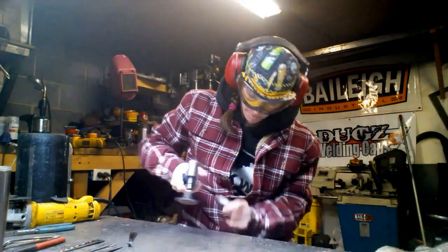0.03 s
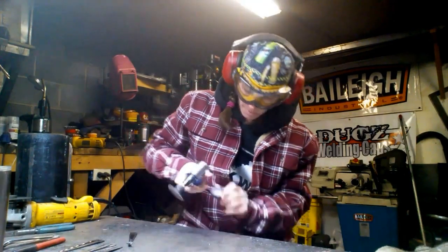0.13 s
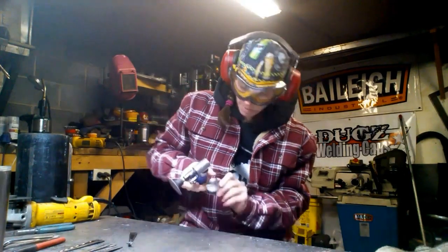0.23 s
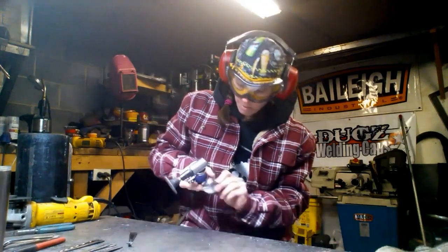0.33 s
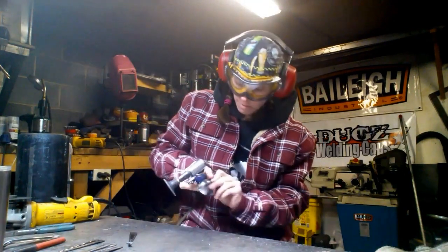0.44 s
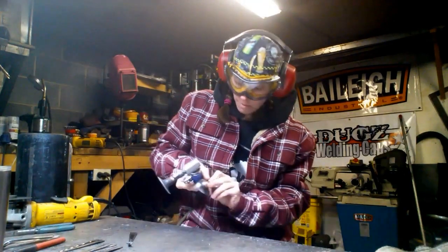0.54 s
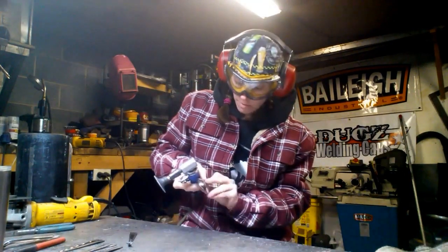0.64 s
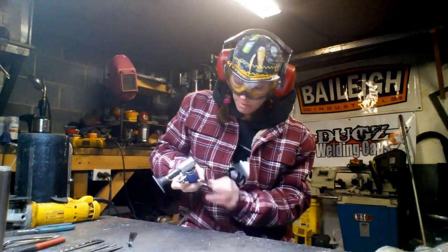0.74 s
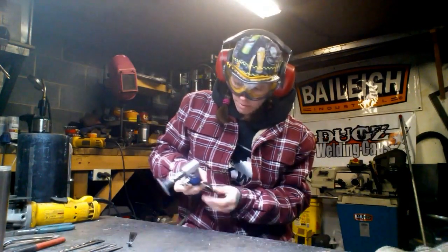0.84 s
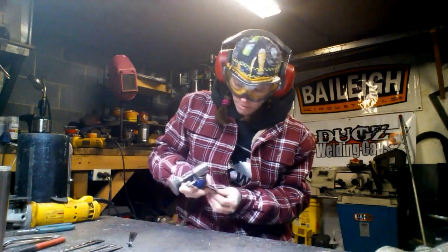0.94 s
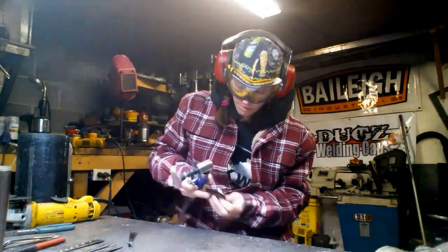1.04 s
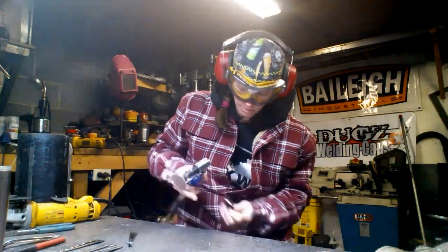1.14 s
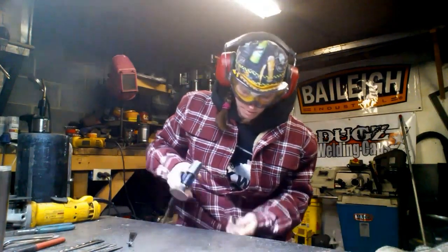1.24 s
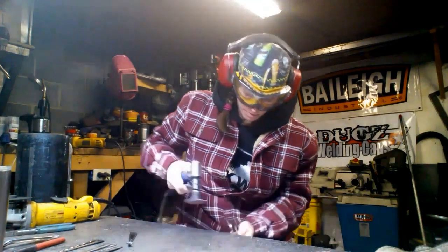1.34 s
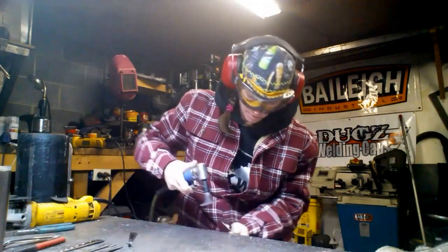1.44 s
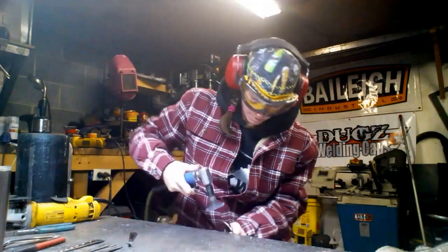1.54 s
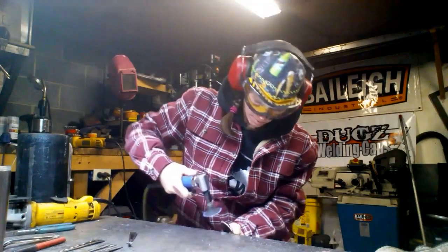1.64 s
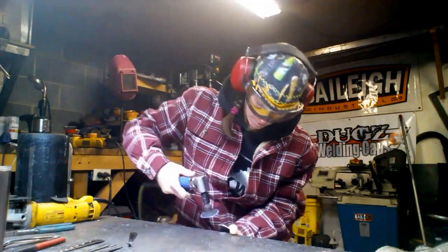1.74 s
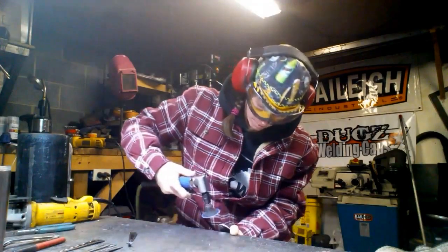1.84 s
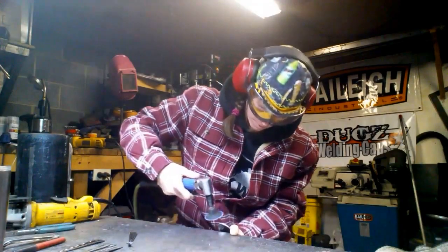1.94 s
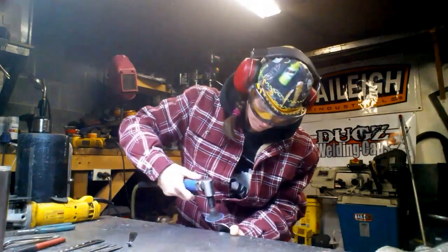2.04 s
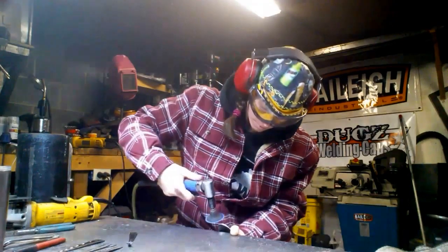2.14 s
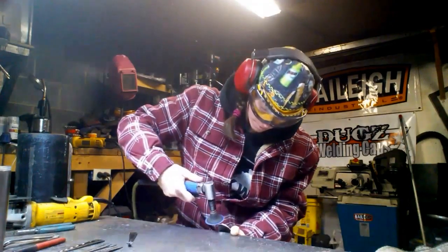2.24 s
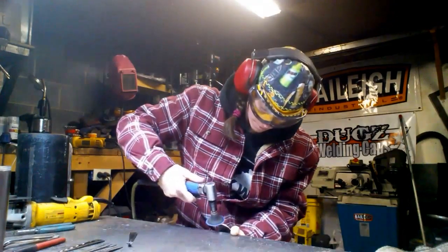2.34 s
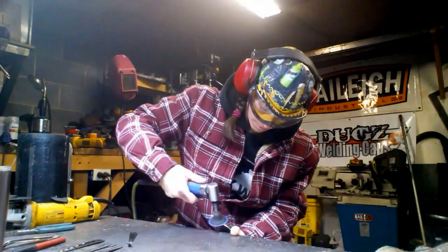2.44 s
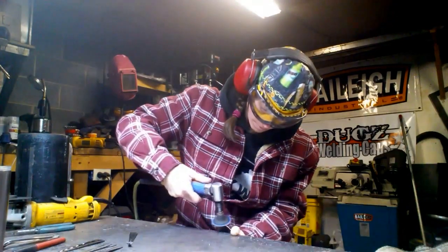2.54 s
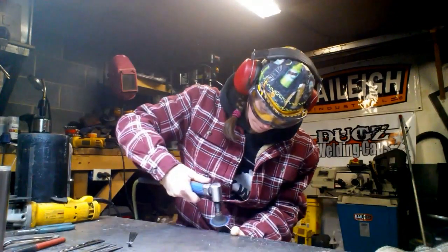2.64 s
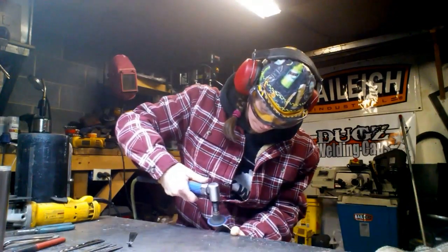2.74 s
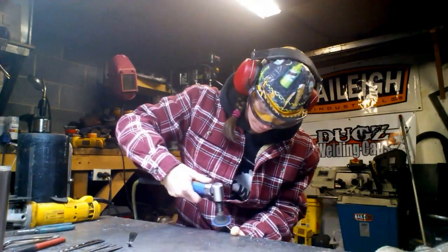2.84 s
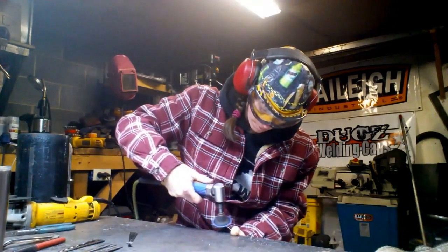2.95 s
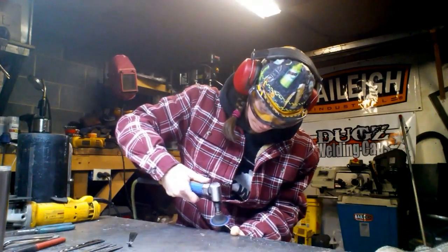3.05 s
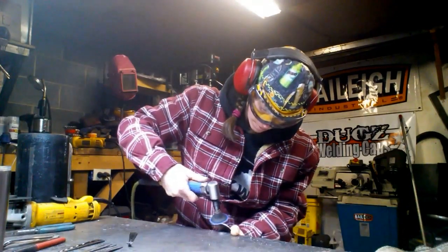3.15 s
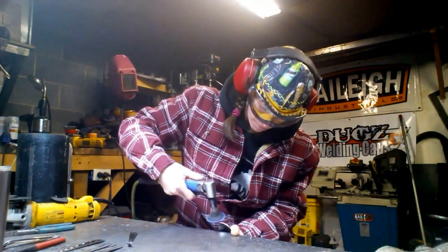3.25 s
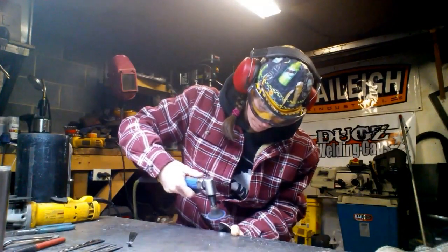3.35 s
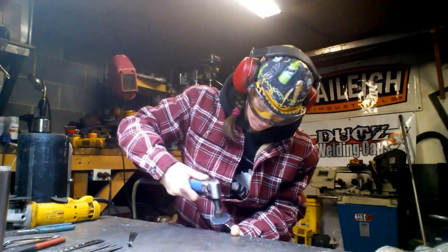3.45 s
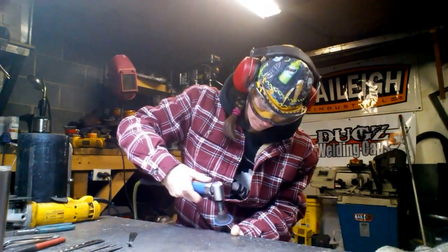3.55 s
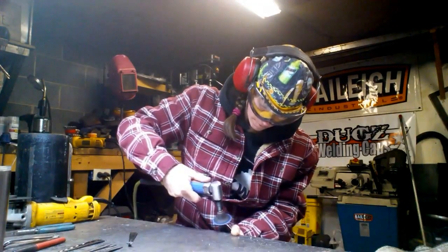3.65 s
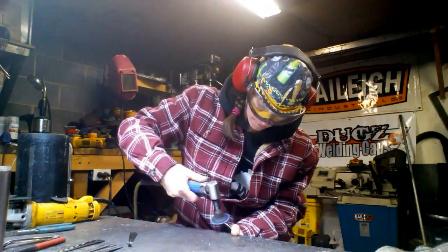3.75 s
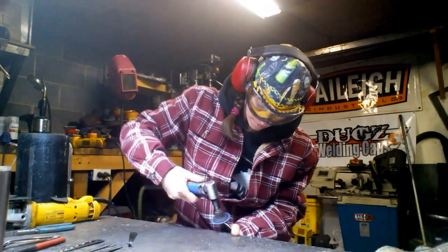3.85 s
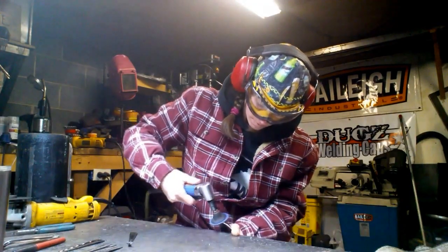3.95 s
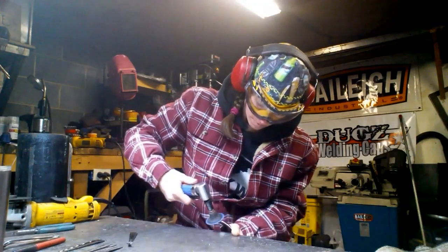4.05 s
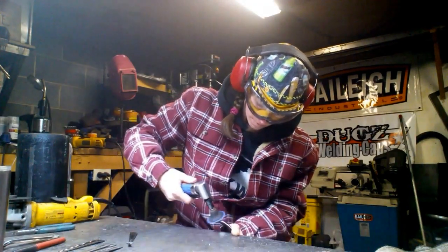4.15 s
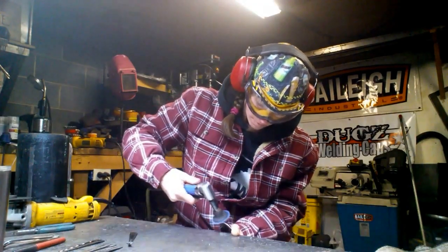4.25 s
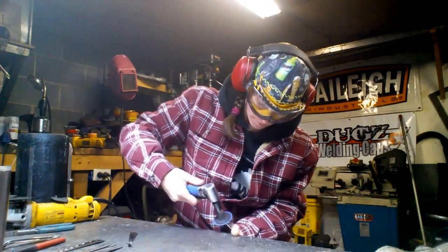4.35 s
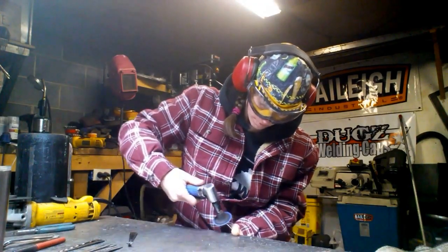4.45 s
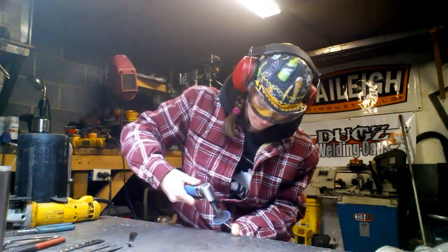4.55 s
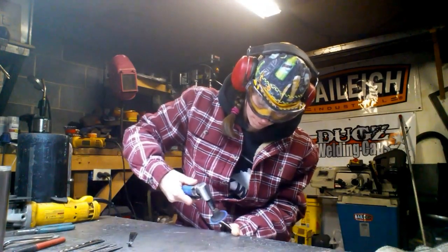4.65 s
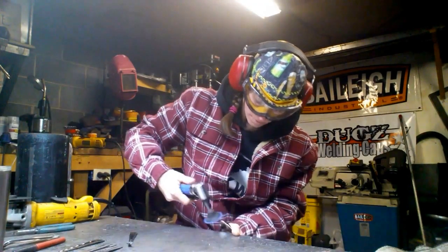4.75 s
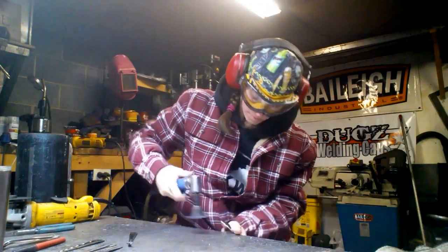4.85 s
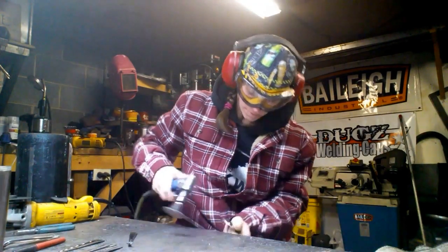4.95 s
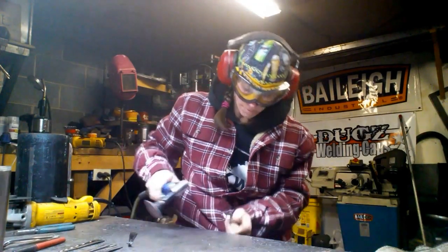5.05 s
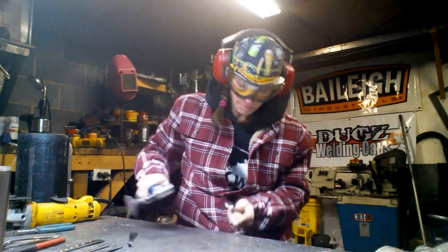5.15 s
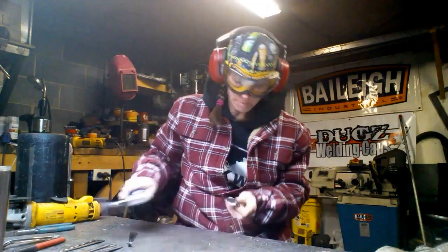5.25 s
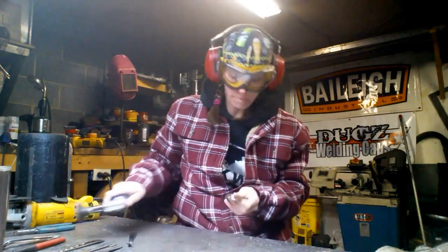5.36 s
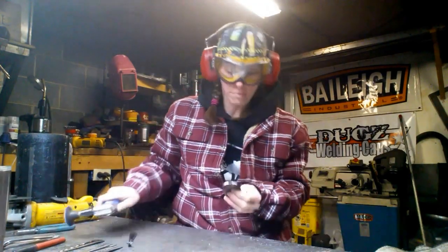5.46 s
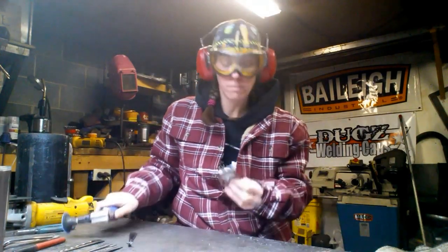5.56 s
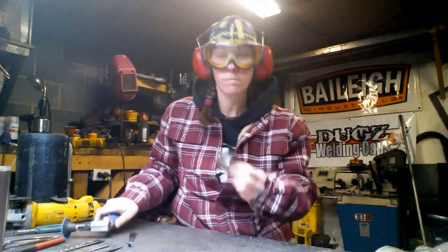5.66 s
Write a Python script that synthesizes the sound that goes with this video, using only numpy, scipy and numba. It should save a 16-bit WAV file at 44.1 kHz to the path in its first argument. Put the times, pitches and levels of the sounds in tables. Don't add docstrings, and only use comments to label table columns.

```python
import sys
import numpy as np
from scipy import signal
from scipy.fft import rfft, irfft
from scipy.io import wavfile
from scipy.ndimage import uniform_filter1d
from numba import njit

SR = 44100
rng = np.random.default_rng(int(sys.argv[2]) if len(sys.argv) > 2 else 0)


def voltage_ratio(decibels):
    exponent = np.asarray(decibels, float) / 20
    return 10 ** exponent


def persist_wave(psi):
    counts = np.round(np.clip(psi, -1, 1) * 32767).astype(np.int16)
    wavfile.write(sys.argv[1], SR, np.atleast_2d(counts).T)


N = 252252
t = np.arange(N) / SR
TOP_HZ = 14540
SQUEEZE_S, SPIN_S = 2.2, 2.243
VANES = 4


def shape(table, hz):
    f, db = np.transpose(table)
    return np.interp(np.log(hz), np.log(f), db, left=-120)


def walk(rate):
    k = int(SR / rate)
    held = np.repeat(rng.standard_normal(N // k + 1), k)
    return 1.305 * uniform_filter1d(uniform_filter1d(held, k), k)[:N]


def noise(table, flicker_db, rate, ridges=()):
    hz = np.arange(N // 2 + 1) * SR / N + 1e-3
    lift = 1 + sum(voltage_ratio(db) / (1 + (2 * (hz - f) / w) ** 2) for f, w, db in ridges)
    white = rfft(rng.standard_normal(N))
    colour = white * voltage_ratio(shape(table, hz)) * lift * (hz < TOP_HZ + 200)
    out = 0
    for k in np.arange(8, 29):
        band = np.cos(np.pi / 2 * np.clip(2 * np.log2(hz) - k, -1, 1)) ** 2
        if np.any(np.abs(colour * band) > 1e-2):
            out = out + irfft(colour * band, N) * voltage_ratio(flicker_db * walk(rate))
    return out / np.std(out)


def ramp(start, length):
    return np.clip((t - start) / length, 0, 1)


# (frequency [Hz], level [dB rms])
HUM = [(120.8, -53), (249, -54), (499, -56), (726.7, -66), (850.6, -69), (1394, -66.5), (1572, -74),
       (1744, -49), (2492, -71.5), (2993, -74), (3289, -70), (3741, -78.5)]
# (frequency [Hz], density [dB per Hz])
SHOP = [(15, -52), (25, -30), (63, -13.5), (120, -6.5), (260, -1.5), (430, -13.5), (600, -13),
        (1000, -17.5), (1600, -19.5), (2200, -21.5), (3300, -20.5), (5700, -27.5), (8800, -27),
        (14400, -25)]
# (frequency [Hz], width [Hz], lift [dB])
FANS = [(567, 65, 3), (654, 14, 3), (1260, 97, -1), (1430, 50, 0), (1965, 170, -0.5), (2580, 170, 2),
        (3110, 98, -2.5), (3310, 97, -3), (3760, 120, 3.5), (7860, 230, 3), (8800, 230, 3)]


def shop():
    hum = 0
    for f, db in HUM:
        level_db = db + 2.4 * walk(12) * min(400 / f, 1)
        drift = np.cumsum(2.5 * walk(8) * (f < 600)) / SR
        line = np.sin(2 * np.pi * (f * t + rng.random() + drift))
        hum = hum + voltage_ratio(level_db) * np.sqrt(2) * line
    return hum + voltage_ratio(-48.5) * noise(SHOP, flicker_db=2.5, rate=9, ridges=FANS)


# (easing starts [s], valve shut [s], loose vanes start to slap [s])
RELEASES = [
    (.062, .0775, .082),
    (4.922, 4.965, 4.973),
]


def trigger():
    first = t < SQUEEZE_S
    ease, shut, slap = (np.where(first, a, b) for a, b in np.transpose(RELEASES))
    slap_rise_s = 0.0084
    return ramp(ease, shut - ease), np.maximum(t - shut, 0), ramp(slap, slap_rise_s)


def gain_db():
    duck_db, lift_db, creep_db_s = -14.5, 13.5, 2.5
    wait_s, lift_s, grab_s = 1.197, 0.085, .03
    before_work = t < SQUEEZE_S + .1
    quiet = np.where(before_work, np.maximum(t - RELEASES[0][1], 0), trigger()[1])
    lift = lift_db / (1 + np.exp((wait_s - quiet) / lift_s)) + creep_db_s * quiet
    grab = np.where(before_work, 1 - ramp(SQUEEZE_S + 0.014, grab_s), 1)
    return duck_db + lift * grab


@njit
def walls(x, lags, gain, damp):
    line, soft, out = np.zeros((8, 4096)), np.zeros(8), np.zeros(len(x))
    for i in range(len(x)):
        total = 0.
        for k in range(8):
            soft[k] += (1 - damp) * (gain[k] * line[k, (i - lags[k]) & 4095] - soft[k])
            total += soft[k]
        out[i] = total
        for k in range(8):
            line[k, i & 4095] = x[i] + soft[k] - total / 4
    return out


# (frequency [Hz], density [dB per Hz])
CRACK = [(470, -28), (800, -9.5), (959, -8.5), (1560, -8.5), (1760, -2.5), (4560, -6), (4970, -4.5),
         (8160, -9.5), (12000, -19), (14400, -21)]


def steel_grain():
    return noise(CRACK, flicker_db=3, rate=170)


# (time [s], peak [dB], crack [dB])
CLINKS = [
    (1.8609, -26, 6),
    (1.896, -17.5, 5),
    (1.9488, -34.5, 6.5),
]
# (frequency [Hz], level [dB], t60 [s])
PIECE = [(955, 0, 0.16), (1238, -0.5, 1.2), (1750, -8.5, 0.27), (3130, -20, 0.061), (3820, 2, 5.0),
         (5260, -6.5, 0.23), (5720, -11.5, 0.19), (5500, -7, 0.086), (6030, -5, 0.036), (6260, -43, 0.77),
         (7260, -6, 0.16), (6700, -34, 5.0), (7500, -7, 0.71), (8134, -3.5, 0.39)]


def clinks(grain):
    out, u = np.zeros(N), t[:8000]
    for s, db, crack_db in CLINKS:
        start = int(s * SR)
        ring = 0
        for f, mode_db, t60 in PIECE:
            mode = np.sin(2 * np.pi * (f * u + rng.random()))
            ring = ring + voltage_ratio(mode_db) * mode * voltage_ratio(-60 * u / min(t60, .12))
        crack = grain[start:][:len(u)] * (voltage_ratio(-60 * u / 0.14) + 0.16 * voltage_ratio(-60 * u / 0.07))
        hit = 0.43 * ring / np.abs(ring).max() + voltage_ratio(crack_db - 13.0) * crack
        out[start:][:len(u)] += voltage_ratio(db - 1.5) * hit * (1 - np.exp(-u / 0.00055))
    return out


# (time [s], peak [dB])
CATCHES = [(0.039, -35), (2.568, -52), (2.778, -27), (2.836, -39.5), (2.865, -40), (2.899, -25),
           (3.002, -42), (3.05, -25.5), (3.074, -31.5), (3.11, -48), (3.393, -38), (3.419, -33),
           (3.484, -27.5), (3.535, -33.5), (3.663, -26)]


def catches(grain):
    out, u = np.zeros(N), t[:8000]
    push = (u / .0005) * (1 - u / 0.0024) * np.exp(1 - u / .0005)
    for s, db in CATCHES:
        start = int(s * SR)
        scrape = 0.33 * grain[start:][:len(u)] * voltage_ratio(-60 * u / 0.1)
        out[start:][:len(u)] += voltage_ratio(db + 5.0) * (push + scrape)
    return out


# (time [s], rate [Hz])
SPEED = [(0, 1380), (.06, 1455), (2.61, 1388), (2.69, 1312), (2.85, 1360), (2.96, 1294), (3.14, 1334),
         (3.4, 1208), (3.5, 1450), (3.7, 1468), (3.95, 1350), (4.17, 1358), (4.255, 1292), (4.32, 1432),
         (4.46, 1388), (4.66, 1422), (4.78, 1368), (4.88, 1250)]


def speed():
    runup_s, runup_shape, coast_s, crawl_hz = .057, 1.2, .088, 125
    inertia_s = .07
    first, idle = t < SQUEEZE_S, trigger()[1]
    free = np.interp(t, *np.transpose(SPEED))
    free = np.where(first, free, uniform_filter1d(free, size=int(inertia_s * SR)))
    free = np.interp(t - idle, t, free)
    run = 1 - np.exp(-(np.maximum(t - SPIN_S, 0) / runup_s) ** runup_shape)
    up = np.where(first, 1, run)
    hz = crawl_hz + (free * up - crawl_hz) * np.exp(-idle / coast_s)
    return uniform_filter1d(hz, size=400), (1380 - free) / 100


# (time after the squeeze [s], level below full flow [dB])
OPENING = [(0, -47), (.01, -12.5), (.024, -12.5), (.036, -0.5), (.052, -6.5), (.08, -2.5), (.13, -0.5)]


def opening_db():
    return np.where(t < SQUEEZE_S, 0, np.interp(t - SQUEEZE_S, *np.transpose(OPENING)))


def puffs(shaft):
    return (1 + .12 * np.sin(shaft)) * (1 + 0.24 * np.sin(VANES * shaft))


# (frequency [Hz], density [dB per Hz])
GRIT = [(880, -8.5), (1500, -17.5), (1700, -10), (2460, -5), (3230, -9), (5010, -7), (5550, -8.5),
        (6070, -14), (7000, -5), (9100, -23.5), (15400, -120)]


def grit(shaft):
    (closed, idle, _), sag = trigger(), speed()[1]
    hold_s, tail_db_s = 0.053, 80
    level_db = -35.5 + 2.4 * opening_db() + 1 * sag - 7 * closed
    level_db = level_db - tail_db_s * np.maximum(idle - hold_s, 0)
    return voltage_ratio(level_db) * puffs(shaft) * noise(GRIT, flicker_db=2.0, rate=25)


# (frequency [Hz], density [dB per Hz])
AIR = [(2940, -32.5), (5000, -13), (5560, -6.5), (6350, -8.5), (7030, -3), (7480, -2.5), (9090, -1.5),
       (13500, 0), (14400, 2.5)]
# (frequency [Hz], width [Hz], lift [dB])
MUFFLER = [(7020, 350, 0), (7950, 200, -4), (8500, 300, -2), (9780, 300, -1), (10680, 350, -1),
           (11450, 200, -3), (12720, 250, -1), (13600, 700, 0), (14420, 150, -5)]
# (frequency [Hz], density [dB per Hz])
BENCH = [(60, -25.5), (150, 0.5), (300, 1), (600, 2.5), (1000, -4), (1500, 2.5), (2200, -27)]


def air_and_bench(shaft):
    (closed, idle, _), sag = trigger(), speed()[1]
    drop_db, tail_db_s = 6.5, 97.5
    level_db = -22.5 + opening_db() - drop_db * closed - tail_db_s * idle
    air = puffs(shaft) * noise(AIR, flicker_db=1.0, rate=25, ridges=MUFFLER)
    dull_s, dull_share = 0.092, 0.48
    air += dull_share * np.minimum(idle / dull_s, 1) * (uniform_filter1d(air, size=3) - air)
    bench = voltage_ratio(-22.5 + 1.6 * sag) * noise(BENCH, flicker_db=4.5, rate=22)
    return voltage_ratio(level_db) * (air + bench)


# (frequency [Hz], width [Hz], level [dB])
EXHAUST = [(680, 480, 1), (1300, 620, -1.5), (2400, 560, 2.5), (5450, 500, 7)]
# (vane rate [Hz], level [dB])
COAST_TONE = [(140, -82), (300, -55), (445, -42.5), (570, -32.5), (690, -27.5), (800, -36), (900, -29),
              (1200, -27.5)]


def exhaust_gain(hz):
    ring = sum(voltage_ratio(db) / np.hypot(1, 2 * (hz - f) / w) ** 2 for f, w, db in EXHAUST)
    return ring / np.hypot(1, (540 / np.maximum(hz, 30)) ** 6)


def motor():
    (closed, idle, loose), (hz, sag) = trigger(), speed()
    octaves = np.log2(np.maximum(hz, 30) / 418)
    loaded_db = -43 + 5 * (1380 - hz) / 100
    top_db = -36.5 + 6 * np.minimum(octaves - 1, 0)
    run_db = np.minimum(loaded_db, top_db) - 24.5 * closed
    tone_db = (1 - loose) * run_db + loose * shape(COAST_TONE, np.maximum(hz, 140))
    coast_slap_db = -42 + 11 * np.minimum(octaves, 0)
    slap_db = (1 - loose) * -53.5 + loose * coast_slap_db
    started = ramp(SPIN_S + 0.0029, 0.011)
    stopping = np.clip((.4 - idle) / 0.074, 0, 1)
    turning = np.where((t >= SQUEEZE_S) & (idle == 0), started, stopping)
    angle = 2 * np.pi * np.cumsum(hz * (1 + .0018 * walk(60))) / SR
    out = voltage_ratio(tone_db + 1 * walk(40)) * np.sin(angle)
    for k in range(2, 9):
        overtone_db = slap_db - 6.5 * (k - 2) ** .8 + 1.5 + 2 * walk(45)
        out += voltage_ratio(overtone_db) * exhaust_gain(k * hz) * np.sin(k * angle + k ** 2)
    return np.sqrt(2) * out * turning, angle / VANES


def scene():
    tone, shaft = motor()
    grain = steel_grain()
    near = tone + clinks(grain) + catches(grain)
    lags = rng.integers(500, 2600, 8)
    room_t60_s = 0.34
    echo = walls(near, lags, voltage_ratio(-60 * lags / SR / room_t60_s), 0.17)
    hiss = air_and_bench(shaft) + grit(shaft)
    mono = near + voltage_ratio(-17) * echo + hiss + voltage_ratio(gain_db()) * shop()
    return np.array([mono, mono])


def starve(x, step_db, tilt_db, count=230):
    n, k = np.arange(2048) + .5, np.arange(count) + .5
    window = np.sin(np.pi * n / 2048)[:, None]
    basis = window * np.cos(np.pi / 1024 * np.outer(n + 512, k)) / np.sqrt(512)
    at = 1024 * np.arange(N // 1024 - 1)[:, None] + np.arange(2048)
    bins = x[at] @ basis
    wander = uniform_filter1d(rng.standard_normal((len(at), count // 6 + 1)), 3, axis=0)
    wander = wander[:, np.arange(count) // 6]
    treble = np.diff(x[at]).std(axis=1)[:, None]
    step = voltage_ratio(step_db + tilt_db * np.log2(k / 20 + 1) + 5 * wander) * treble
    rounded = np.sign(bins) * np.floor(np.abs(bins) / step + .4) * step
    out = x.copy()
    np.add.at(out, at, (rounded - bins) @ basis.T)
    return out


# (time [s], centre [Hz])
FILLS = [(2.105, 7600), (2.129, 13200), (2.965, 11580), (2.965, 5160), (3.036, 13300), (3.08, 11130),
         (3.404, 4600), (4.125, 14100), (4.681, 12400), (4.68, 6200), (4.89, 9700), (4.89, 5830)]


def side_patches(mono):
    side, hz = np.zeros(N), np.arange(1025) * SR / 2048
    for s, mid_hz in FILLS:
        start = int(s * SR) - 1024
        near_mid = np.abs(hz / mid_hz - 1) < 0.076
        band = np.abs(rfft(mono[start:][:2048])) * near_mid
        patch = irfft(band * np.exp(2j * np.pi * rng.random(1025)))
        side[start:][:2048] += voltage_ratio(-3.5) * patch * signal.windows.tukey(2048, .7)
    return side


def top_cut(x):
    return signal.sosfilt(signal.butter(12, 15560, fs=SR, output="sos"), x)


def record(dry):
    clip = .5
    limited = clip * np.tanh(dry[0] / clip)
    over_hz = np.clip(np.arange(N + 1) * SR / 2 / N - TOP_HZ + 40, 0, 400)
    mono = irfft(rfft(limited, 2 * N) * voltage_ratio(-over_hz ** 2 / 300))[:N]
    mono = starve(mono, step_db=-6, tilt_db=-1.1)
    side = side_patches(mono)
    return top_cut(mono + np.array([side, -side]))


dry = scene()
out = record(dry)
persist_wave(out)
```